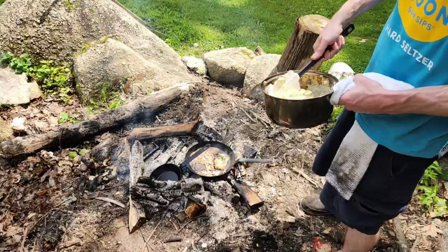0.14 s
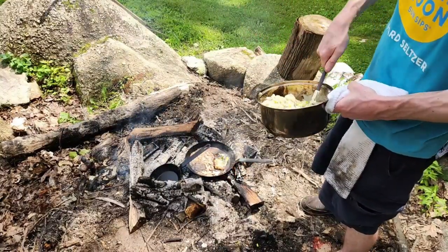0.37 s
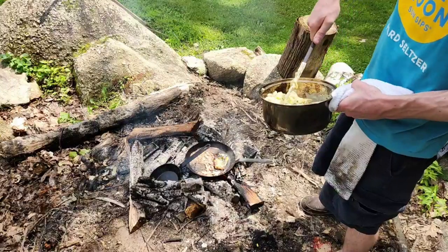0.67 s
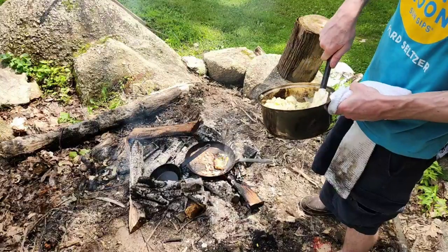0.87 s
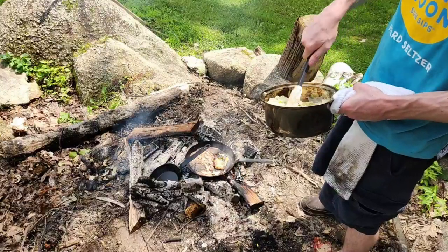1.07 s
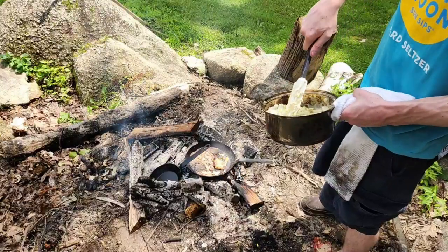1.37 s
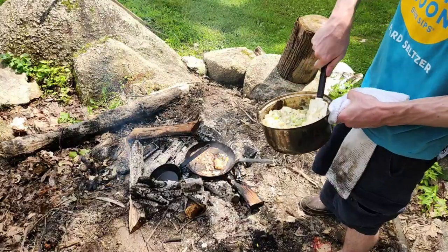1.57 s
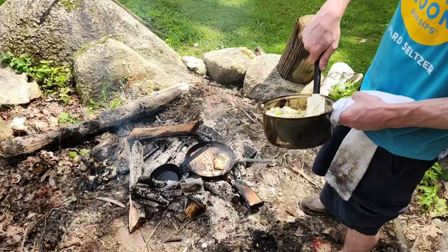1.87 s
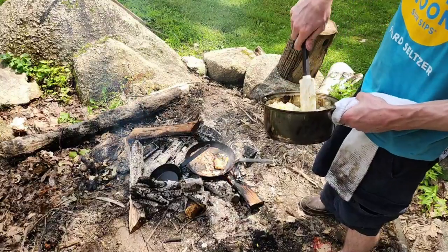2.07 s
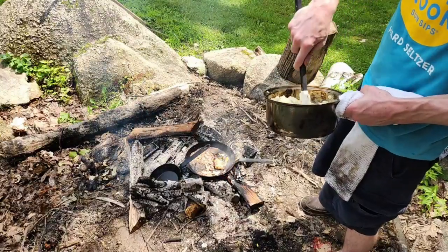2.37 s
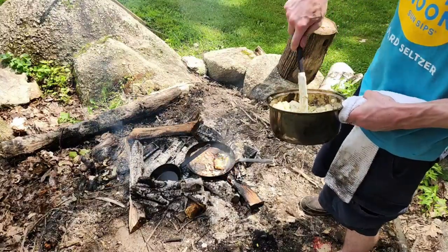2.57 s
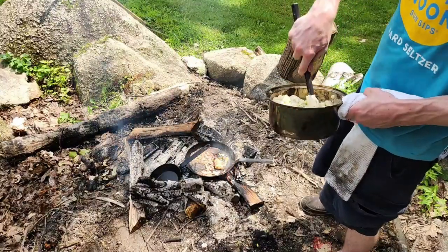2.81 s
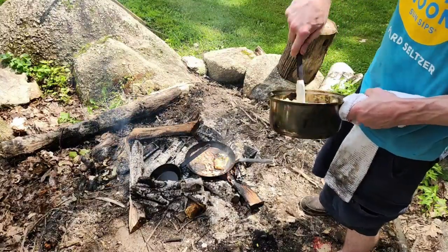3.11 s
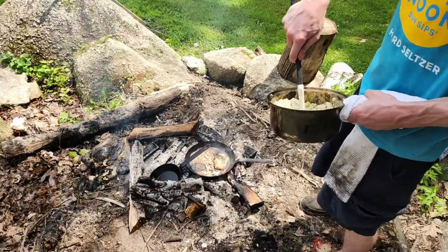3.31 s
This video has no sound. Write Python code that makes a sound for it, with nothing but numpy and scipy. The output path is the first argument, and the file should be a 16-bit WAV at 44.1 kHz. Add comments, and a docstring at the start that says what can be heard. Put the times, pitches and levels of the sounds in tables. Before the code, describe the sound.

Fish fries in a skillet over a campfire, a steady, bright, grainy sizzle flickering in level throughout. Fat spits cluster at 0.3-1.0 s and 1.45-1.85 s, with sharper ones near 0.4, 2.1, 2.5 and 3.07 s. Tiny high bubbles plop, clearest around 2.43 s. An ember snaps very loudly at 2.9 s. Faint spoon knocks, falling bird whistles, wavering hum and low rumble lie beneath.

```python
"""Fish fries in butter in an iron skillet over a campfire: thousands of tiny steam bursts a second come as
clicks in clumps, over noise hiss and ringing bubbles; bigger noise bursts spit, bubbles plop, one ember snaps.
A spoon wakes the damped modes of a pot nearby. A far bird whistles falling sines over a faint wavering hum,
light air on the microphone and low rumble. The sizzle's colour peaks near 8.4 kHz and the snap rings at 8.6 kHz;
a small microphone pair hears the treble wide, the bass in the middle."""
import sys
import numpy as np
from scipy import signal
from scipy.fft import rfft, irfft, next_fast_len
from scipy.io import wavfile
from scipy.ndimage import uniform_filter1d, map_coordinates

SR = 44100
rng = np.random.default_rng(int(sys.argv[2]) if len(sys.argv) > 2 else 0)


def boost(x):
    """Linear amplitude factor 10**(x/20) for a level x in decibels (scalar or array-like)."""
    u = np.asarray(x, float) / 20
    return 10 ** u


def wrap_up_sound(samples):
    """Save the sound to the file named by the first command line argument, as 16-bit audio."""
    columns = np.atleast_2d(samples).T
    # keep every value between -1 and 1, then stretch to whole-number steps
    tamed = np.clip(columns, -1, 1)
    steps = np.round(tamed * 32767).astype(np.int16)
    wavfile.write(sys.argv[1], SR, steps)


N = 152145


def unit(x):
    """Scale to rms 1."""
    return x / np.sqrt(np.mean(x ** 2) + 1e-20)


def along(points, hz):
    """(Hz, value) points read on a log frequency axis."""
    f, v = np.transpose(points)
    return np.interp(np.log(hz + 1), np.log(f + 1), v)


def wobble(knots_per_s):
    """Smooth random curve: a spline over normal random knots."""
    count = int(N * knots_per_s / SR) + 4
    return map_coordinates(rng.standard_normal(count), [np.arange(N) * knots_per_s / SR])


def coloured(x, points):
    """x through a causal minimum-phase filter with the gain of the (Hz, dB) points."""
    n = x.shape[-1]
    m = 2 * next_fast_len(n // 2 + 2048)
    gain = boost(along(points, np.fft.rfftfreq(m, 1 / SR)))
    cepstrum = irfft(np.log(gain + 1e-6), m)
    # folding the cepstrum makes the phase minimal
    cepstrum[1:m // 2] *= 2
    cepstrum[m // 2 + 1:] = 0
    return irfft(rfft(x, m) * np.exp(rfft(cepstrum)), m)[..., :n]


def place(times_s, shapes):
    """Mid and side tracks: each row of shapes at its time, from a random spot in the pan."""
    start = np.round(np.asarray(times_s) * SR).astype(int)
    at = start[:, None] + np.arange(shapes.shape[1])
    spot = rng.standard_normal((len(at), 1))
    return np.array([np.bincount(at.ravel(), (shapes * w).ravel(), N + SR)[:N] for w in (1, spot)])


def rings(pitch_hz, cycles):
    """Damped sines with a soft onset, one a row; the decay reaches exp(-2) after the given cycles."""
    turns = np.asarray(pitch_hz)[:, None] * np.arange(300) / SR
    return np.sin(2 * np.pi * turns) * np.exp(-2 * turns / cycles) * (1 - np.exp(-2 * turns))


def sizes(draw, spread_db):
    """Burst gains: many small, few large, capped at 4 spreads over the smallest."""
    return boost(spread_db * np.minimum(-np.log(1 - draw), 4))


def bubbles(per_s, centre_hz, half_span_octaves, cycles, spread_db):
    """Ringing bubbles at random times, pitched around a centre; mid and side together have rms 1."""
    draw = rng.random((int(per_s * N / SR), 3))
    pitch_hz = centre_hz * 2 ** (half_span_octaves * (2 * draw[:, 1] - 1))
    return unit(place(draw[:, 0] * N / SR, rings(pitch_hz, cycles) * sizes(draw[:, 2:], spread_db)))


FIZZ_PER_S, FIZZ_SPREAD_DB, FIZZ_DB = 5000, 3.5, -2
HISS_DB, HISS_PATCHY_DB, HISS_CLUMPING = -0.5, 2.5, 0.29  # clumping: exponent on the clumps
MIDDLE_BUBBLES_DB, LOW_BUBBLES_DB = -28, -37.5  # re fizz and hiss together
# how hard the fat boils: time_s, level_db
BOIL = [(0, -33.5), (.22, -33.5), (.31, -32), (.37, -34.5), (.46, -33.5), (.53, -30.5), (.6, -34),
        (.72, -32.5), (.8, -31.5), (.88, -34), (.98, -32), (1.05, -33), (1.19, -35.5), (1.4, -35),
        (1.5, -33.5), (1.62, -33), (1.75, -35.5), (1.83, -31.5), (1.9, -34.5), (2.06, -33), (2.2, -33),
        (2.5, -33), (2.78, -34.5), (2.95, -34), (3.06, -31), (3.15, -35), (3.25, -33.5), (3.33, -33.5),
        (3.45, -35)]
# boiling comes in clumps: knots_per_s, depth_db
CLUMPS = [(12, 1.3), (30, 1.18), (90, 1.75), (300, 0.5)]
# colour of a bursting bubble at the microphone, also used by spits(): freq_hz, gain_db
SIZZLE_COLOUR = [(240, -72), (400, -37.5), (558, -39.5), (804, -34), (1210, -24.5), (2360, -33),
                 (3100, -19.5), (4460, -15), (6820, -17), (8060, -1), (8430, 2), (9960, -6), (10700, -17.5),
                 (12300, -10.5), (13700, -12.5), (14300, -36), (15000, -39.5)]


def sizzle():
    """Steam bursts as clicks, unresolved steam as patchy noise, bubbles as rings; all follow the boil."""
    time_s, level_db = np.transpose(BOIL)
    clumps = boost(sum(depth_db * wobble(knots_per_s) for knots_per_s, depth_db in CLUMPS))

    draw = rng.random((int(FIZZ_PER_S * N / SR), 3))
    clicks = np.sign(draw[:, 1:2] - .5) * sizes(draw[:, 2:], FIZZ_SPREAD_DB)
    fizz = place(draw[:, 0] * N / SR, clicks)

    spectra = signal.stft(rng.standard_normal((2, N)), nperseg=256)[2]
    patches = uniform_filter1d(rng.standard_normal(spectra.shape[1:]), 8, 0)
    patches = unit(uniform_filter1d(patches, 4, 1))
    hiss = signal.istft(spectra * boost(HISS_PATCHY_DB * patches), nperseg=256)[1][:, :N]

    fizz = boost(FIZZ_DB) * unit(clumps * fizz)
    hiss = boost(HISS_DB) * unit(clumps ** HISS_CLUMPING * hiss)
    fine = unit(coloured(fizz + hiss, SIZZLE_COLOUR))

    middle = boost(MIDDLE_BUBBLES_DB) * bubbles(
        per_s=180, centre_hz=4480, half_span_octaves=0.46, cycles=1.9, spread_db=6)
    low = boost(LOW_BUBBLES_DB) * bubbles(
        per_s=150, centre_hz=1257, half_span_octaves=0.66, cycles=3.2, spread_db=3.5)
    boil = boost(np.interp(np.arange(N) / SR, time_s, level_db))
    return boil * (fine + low + middle)


def burst(count, decay_s, rise_s):
    """Short noise bursts that rise and die, one a row."""
    t = (np.arange(200) + 1) / SR
    return rng.standard_normal((count, 200)) * np.exp(-t / decay_s) * (1 - np.exp(-t / rise_s))


SPIT_DECAY_S, SPIT_RISE_S = 0.0006, 0.000071
LOWS_HZ, MIDDLE_HZ, SPIT_LOWS_DB = 2600, 6400, -6  # upper band edges; extra gain below LOWS_HZ
# big spits of fat: start_s, peak_db, middle_db (gain below MIDDLE_HZ)
SPITS = [(0.298, -16.5, -8), (0.3084, -15.5, -7), (0.3108, -20, -7), (0.3149, -20, -12), (0.3288, -22, -6),
         (0.405, -10, 2), (0.4103, -17, 0), (0.4822, -18.5, -11), (0.5426, -20, -11), (0.6056, -16.5, -12),
         (0.608, -22, -8), (0.718, -17, -6), (0.787, -17.5, -11), (0.8002, -15.5, -14), (0.9185, -16, -6),
         (0.971, -15, -16), (1.4556, -16, -5), (1.5056, -16, -8), (1.533, -16, -5), (1.5928, -15, -8),
         (1.6577, -23, -13), (1.8176, -14.5, 0), (1.8225, -14.5, 7.5), (1.846, -19, 9), (2.1076, -8.5, 0.5),
         (2.111, -12.5, 1), (2.12, -17.5, -5), (2.494, -16.5, 4.5), (2.4961, -10.5, -3), (2.5017, -19, -3),
         (2.8232, -15.5, -3), (3.0724, -10, -10), (3.2704, -18.5, 1.5)]


def spits():
    """Spitting fat: noise bursts in the sizzle's colour, each with its own share below the treble."""
    start_s, peak_db, middle_db = np.transpose(SPITS)
    hz = np.fft.rfftfreq(400, 1 / SR)
    share_db = np.where(hz < MIDDLE_HZ, middle_db[:, None], 0) + SPIT_LOWS_DB * (hz < LOWS_HZ)
    shapes = np.pad(burst(len(start_s), SPIT_DECAY_S, SPIT_RISE_S), ((0, 0), (20, 180)))
    shapes = coloured(irfft(rfft(shapes) * boost(share_db)), SIZZLE_COLOUR)
    shapes = shapes / np.abs(shapes).max(1, keepdims=True) * boost(peak_db)[:, None]
    return place(start_s, shapes)


# bubble plops: start_s, level_db, pitch_hz
PLOPS = [(0.3148, -30, 4300), (0.5132, -32, 5180), (0.5436, -32, 4200), (0.626, -30, 4470),
         (0.6664, -28.5, 3860), (0.7964, -38, 4680), (0.8485, -29, 4290), (1.1423, -28.5, 4500),
         (1.2268, -28.5, 4540), (1.5034, -27, 4560), (1.6796, -29.5, 4760), (1.7312, -25.5, 4490),
         (2.17, -30, 4300), (2.1971, -25.5, 4500), (2.379, -35, 3790), (2.4259, -20.5, 4800),
         (2.533, -28, 3970), (2.6736, -29, 3250), (2.9641, -29, 4600), (2.9751, -34, 3100),
         (3.036, -27, 4600), (3.378, -28.5, 4300), (3.4406, -23.5, 4550)]


def plops():
    """Single bubbles ring briefly as damped sines."""
    start_s, level_db, pitch_hz = np.transpose(PLOPS)
    return place(start_s, rings(pitch_hz, cycles=8.9) * boost(level_db)[:, None])


SNAP_S, SNAP_DECAY_S, SNAP_PEAK_DB, SNAP_SIDE = 2.9015, .00001, 2.5, .2
SNAP_SPLIT_HZ, SNAP_LATE_SHARE, SNAP_LATE_S = 7500, .4, .0004
SNAP_RING_HZ, SNAP_RING_CYCLES, SNAP_RING_DB = 8620, 15, -6
ECHO_S, ECHO_DB = .0042, -18
# colour of the snap: freq_hz, gain_db
SNAP_COLOUR = [(120, -55), (250, -41), (700, -12.5), (1500, -3), (2200, -5), (2790, -32), (3400, -6),
               (4730, -2), (6800, -1.5), (8600, -10), (10200, 0.5), (10800, -22), (11700, 2.5),
               (12800, -19), (13900, 0.5), (15000, -25)]


def ember():
    """One dry snap in two cracks, the second only treble, which rings on; a stone sends back a thin echo."""
    click = np.exp(-np.arange(20)[None] / SR / SNAP_DECAY_S)
    crack = coloured(place([SNAP_S], click)[0], SNAP_COLOUR)
    treble = coloured(crack, [(SNAP_SPLIT_HZ / 2, -40), (SNAP_SPLIT_HZ, 0)])
    late = np.interp(np.arange(N) - SNAP_LATE_S * SR, np.arange(N), treble)
    snap = crack + SNAP_LATE_SHARE * late
    ring = place([SNAP_S + SNAP_LATE_S], rings([SNAP_RING_HZ], SNAP_RING_CYCLES))[0]
    snap = snap / np.abs(snap).max() + boost(SNAP_RING_DB) * ring
    echo = np.roll(treble / np.abs(treble).max() + ring, round(ECHO_S * SR))
    snap = snap + boost(ECHO_DB) * echo
    return boost(SNAP_PEAK_DB) * snap / np.abs(snap).max() * [[1], [SNAP_SIDE]]


# knocks of the spoon: start_s, level_db
KNOCKS = [(.405, -39.5), (.751, -49), (.868, -50), (1.502, -49.5), (1.595, -45.5), (1.822, -44.5),
          (2.107, -43), (2.494, -40)]
# modes of a steel pot full of food: pitch_hz, level_db, t60_s
POT = [(786, -13, .025), (1174, -3, .035), (1444, -7, 0.022), (1700, -12, .02)]


def spoon():
    """Every knock wakes the damped modes of the pot anew, in a slightly different balance."""
    start_s, level_db = np.transpose(KNOCKS)
    t = np.arange(3000) / SR
    scatter_db = 1.5 * rng.standard_normal((len(start_s), len(POT)))
    modes = np.array([boost(mode_db - 60 * t / t60_s) * np.sin(2 * np.pi * pitch_hz * t)
                      for pitch_hz, mode_db, t60_s in POT])
    return place(start_s, boost(level_db[:, None] + scatter_db) @ modes)[0]


UPTURN_HZ_PER_S, UPTURN_DB, UPTURN_FADE_S = 22000, -3, .0092
NOTE_JITTER_HZ, NOTE_FLUTTER_DB, NOTE_EDGE = 30, 2, 6  # edge: steepness of the note's ends
NOTE_ECHO_S, NOTE_ECHO_DB = .011, -9
# bird notes: start_s, length_s, start_hz, low_hz, bend (1 = straight fall), level_db, upturn_s
NOTES = [(.072, .058, 3450, 2520, .7, -53.5, .032), (0.964, .119, 3400, 2500, 1.8, -56.5, 0.035),
         (2.658, 0.077, 3500, 2700, 1, -55.5, 0), (2.803, 0.071, 3600, 2680, .85, -54.5, 0),
         (2.94, .062, 3700, 2560, 1, -52.5, 0)]


def bird():
    """Falling whistles, unsteady through leaves, thrown back by trees; some flick faintly up again."""
    out, t = np.zeros(N), np.arange(N) / SR
    for start_s, length_s, start_hz, low_hz, bend, note_db, upturn_s in NOTES:
        fall = np.clip((t - start_s) / length_s, 0, 1)
        after_s = np.clip(t - start_s - length_s, 0, upturn_s)
        hz = start_hz + (low_hz - start_hz) * fall ** bend
        hz = hz + UPTURN_HZ_PER_S * after_s + NOTE_JITTER_HZ * wobble(150)
        progress = np.clip((t - start_s) / (length_s + upturn_s), 0, 1)
        swell = np.sqrt(2) * np.minimum(1, NOTE_EDGE * np.abs(np.sin(np.pi * progress)))
        level_db = note_db + NOTE_FLUTTER_DB * wobble(90)
        level_db = level_db + UPTURN_DB * np.minimum(after_s / UPTURN_FADE_S, 1)
        out += boost(level_db) * swell * np.sin(2 * np.pi * np.cumsum(hz) / SR)
    return out + boost(NOTE_ECHO_DB) * np.roll(out, round(NOTE_ECHO_S * SR))


HUM_WAVER_DB, HUM_WAVER_HZ = 2.2, 2.44
# hum tones: pitch_hz, rms_db
HUM = [(106, -71), (164.6, -60)]


def hum():
    """Faint sines whose level and pitch waver."""
    t, out = np.arange(N) / SR, np.zeros(N)
    for pitch_hz, rms_db in HUM:
        level = np.sqrt(2) * boost(rms_db + HUM_WAVER_DB * wobble(7.7))
        turns = pitch_hz * t + HUM_WAVER_HZ * np.cumsum(wobble(5)) / SR
        out += level * np.sin(2 * np.pi * turns)
    return out


# light air on the microphone: time_s, level_db
BREEZE = [(0, -64), (2.4, -69), (2.7, -59.5), (3.45, -63.5)]
# its colour: freq_hz, gain_db
BREEZE_COLOUR = [(8, -25), (20, 4), (40, 1), (70, -34.5)]


def breeze():
    """Light air on the microphone: deep coloured noise of changing level."""
    level = boost(np.interp(np.arange(N) / SR, *np.transpose(BREEZE)))
    return level * unit(coloured(rng.standard_normal(N), BREEZE_COLOUR))


RUMBLE_DB, RUMBLE_WAVER_DB = -65, 1.0
# colour of the rumble of fire and distance: freq_hz, gain_db
RUMBLE_COLOUR = [(26, -51), (45, -2), (65, -7.5), (114, -5), (162, -8), (188, -19.5), (216, -9),
                 (588, -23.5), (900, -19), (1170, -29), (1980, -120)]


def rumble():
    """Fire and distance: low coloured noise that wavers slowly."""
    level = boost(RUMBLE_DB + RUMBLE_WAVER_DB * wobble(1.82))
    return level * unit(coloured(rng.standard_normal(N), RUMBLE_COLOUR))


# stereo width, gain of the side track: freq_hz, gain_db
WIDTH = [(2500, -54), (3300, -32), (4400, -25), (6500, -11.5), (8500, -6.5), (10300, -7), (12500, -4.5),
         (15000, -6.5)]


def scene():
    """Spread-out sources differ between the microphones mainly in the treble; the rest is central."""
    mid, side = sizzle() + spits() + plops() + ember()
    mid = mid + spoon() + bird() + hum() + breeze() + rumble()
    side = coloured(side, WIDTH)
    return np.array([mid + side, mid - side])


def roll_off(x):
    """The treble ends steeply here."""
    return signal.sosfilt(signal.butter(12, 15580, fs=SR, output="sos"), x)


CLIP_TOP, TOP_HZ = .8, 14280


def record(dry):
    """The middle signal clips softly towards CLIP_TOP; a steep low-pass limits the band."""
    mid = dry.mean(0)
    clipped = mid / (1 + np.abs(mid / CLIP_TOP) ** 4) ** .25
    mix = dry - mid + clipped
    low_pass = signal.ellip(10, .3, 45, TOP_HZ, fs=SR, output="sos")  # order, ripple dB, stop dB
    limited = signal.sosfilt(low_pass, mix)
    return roll_off(limited)


dry = scene()
out = record(dry)
wrap_up_sound(out)
```